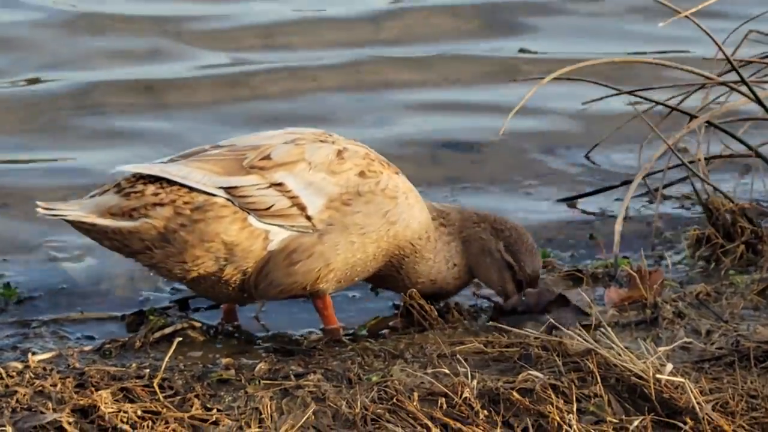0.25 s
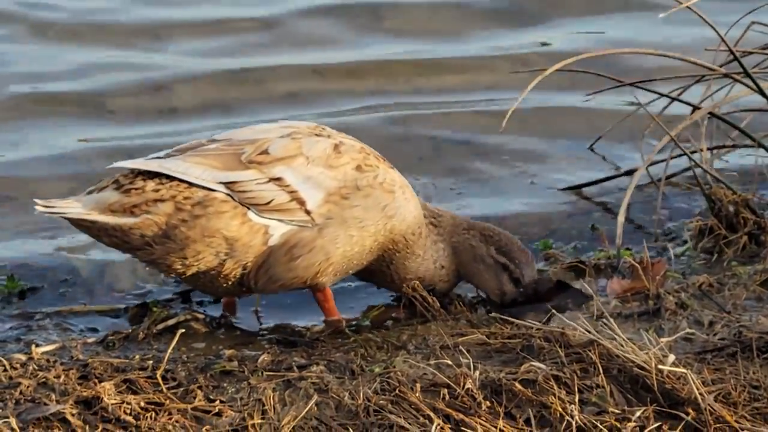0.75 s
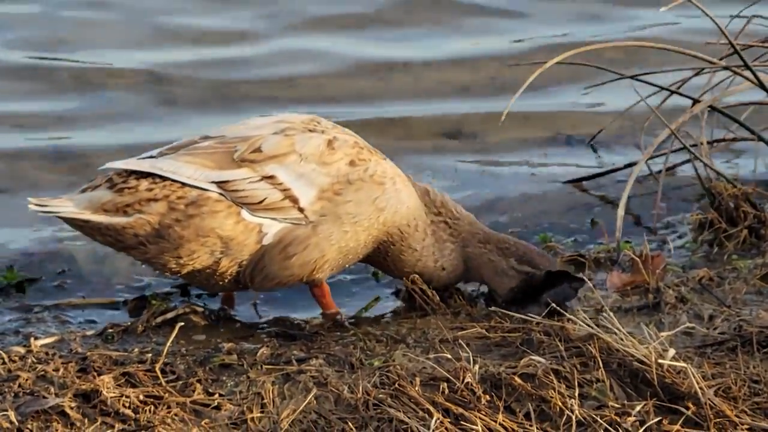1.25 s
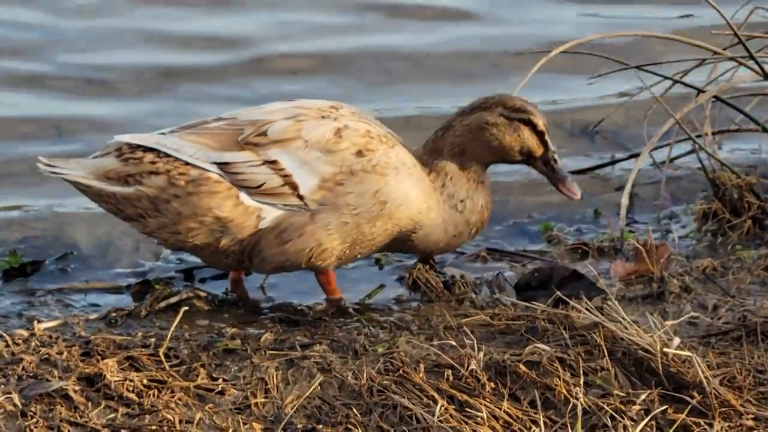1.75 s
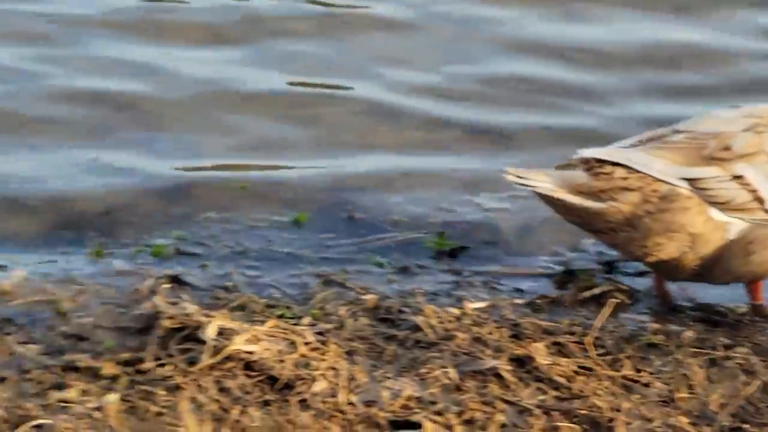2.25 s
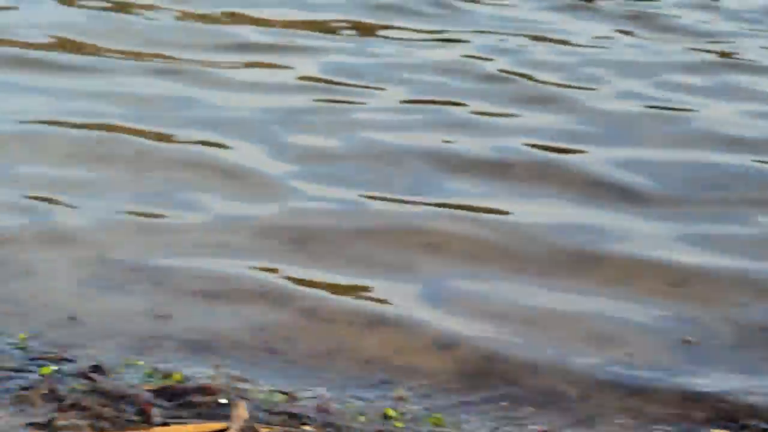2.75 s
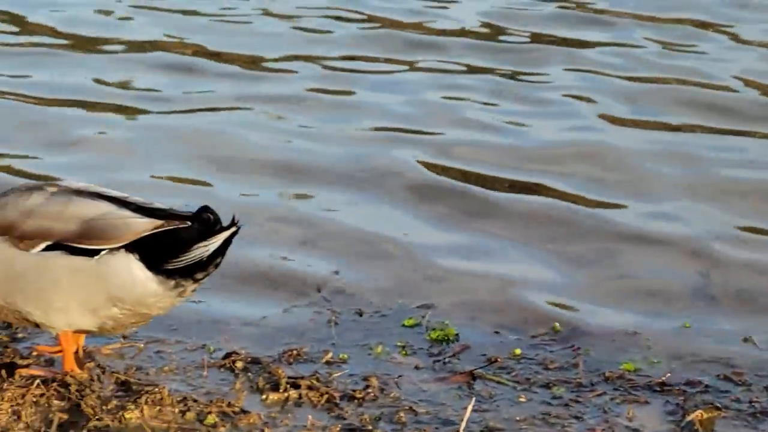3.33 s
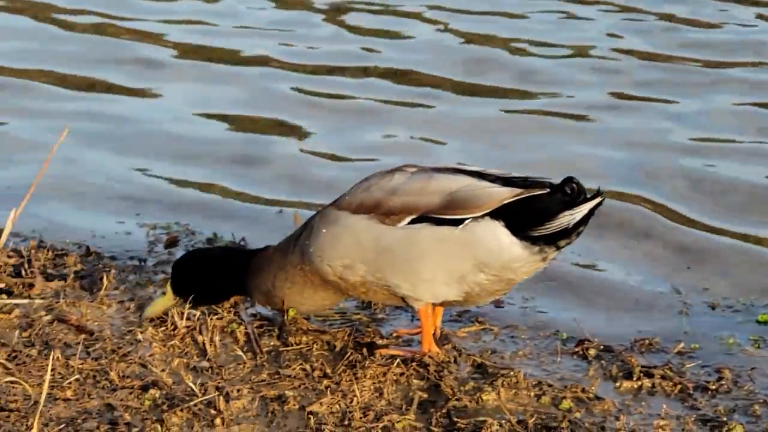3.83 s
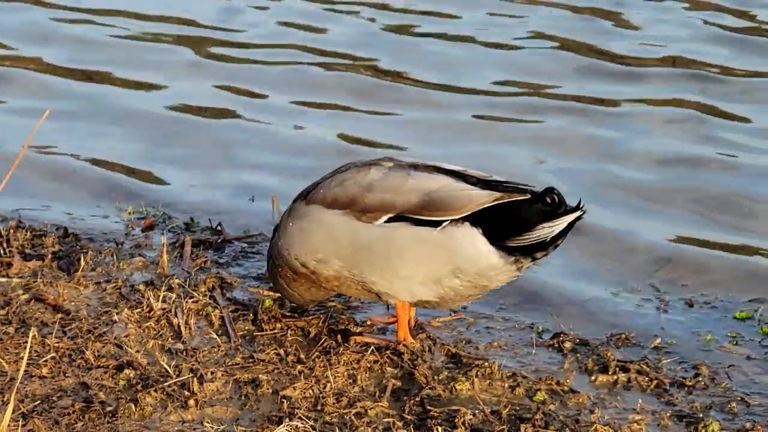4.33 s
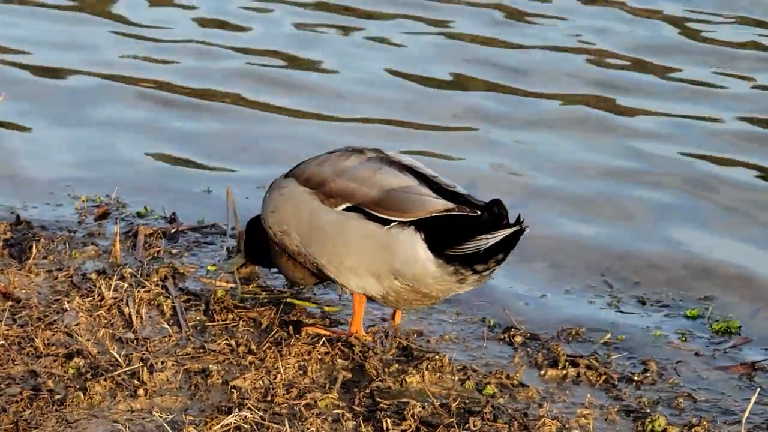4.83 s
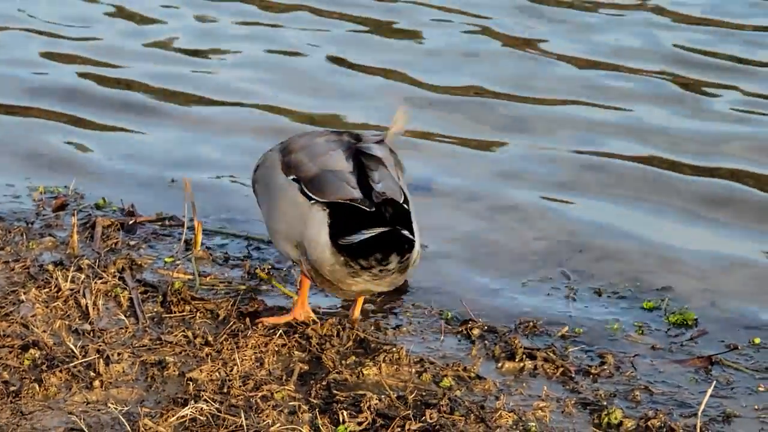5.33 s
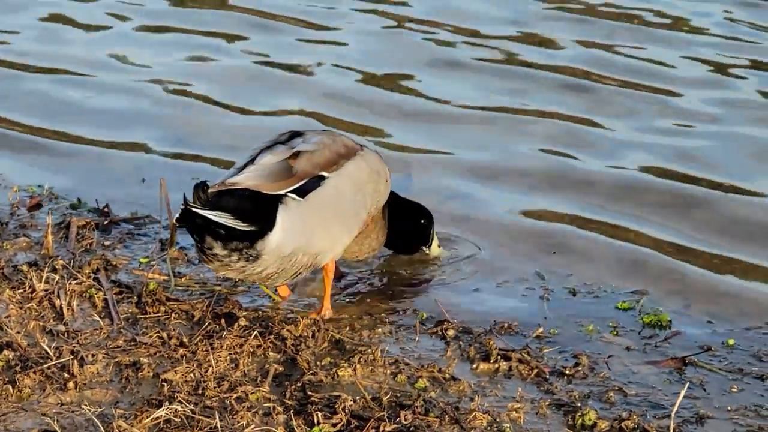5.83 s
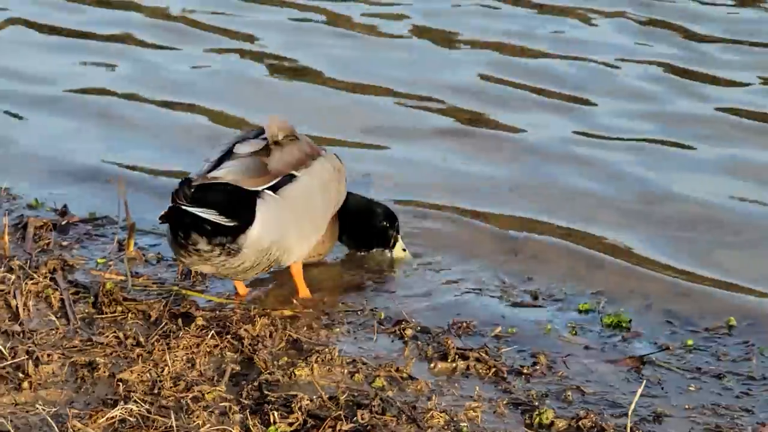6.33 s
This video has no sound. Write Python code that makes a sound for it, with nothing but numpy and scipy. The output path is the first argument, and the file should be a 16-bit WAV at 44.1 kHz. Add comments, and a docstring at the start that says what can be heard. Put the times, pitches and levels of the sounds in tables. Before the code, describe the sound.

Close by on a muddy shore, a duck works its bill fast through wet mud: sharp wet pops, squelching and fine crackle, strongest just after one second. It pauses around two seconds, then a second duck brings another crisp burst near three. After that only scattered ticks and small bubbles remain. Wind flutters and thumps low on a hand-held stereo microphone, over faint open-air rumble and hiss.

```python
"""A muddy shore, where two ducks dabble: their bills pop, squelch and crackle through wet mud and stalks.
Each pop is a burst of snaps and noise that rings a cavity; the squelch is made of many tiny bubbles.
Larger bubbles plop in the shallows, and a close surface, the ground and the bank echo the feeding.
Wind, made of filtered noise, rumbles and thumps on the two ports of a hand-held microphone,
over a far rumble of open air and a soft hiss."""
import sys
import numpy as np
from scipy import signal
from scipy.fft import rfft, irfft, next_fast_len
from scipy.io import wavfile
from scipy.ndimage import uniform_filter1d

SR = 44100
rng = np.random.default_rng(int(sys.argv[2]) if len(sys.argv) > 2 else 0)


def unload_wav(signal):
    """Save mono or channel-first audio to the path in sys.argv[1] as 16-bit WAV at rate SR, clipped to [-1, 1]."""
    wavfile.write(
        sys.argv[1],
        SR,
        np.round(np.clip(np.atleast_2d(signal).T, -1, 1) * 32767).astype(np.int16),
    )


N = 290178
TIME = np.arange(N) / SR  # seconds

# Strength of the gusts on the ports. Each row: time in seconds, left level in dB, right level in dB.
GUSTS = [(0.0, -30, -35.5), (0.25, -29.5, -35), (0.62, -41.5, -43), (0.95, -38.5, -39), (1.2, -29.5, -23),
         (1.5, -38.5, -43.5), (2.1, -33, -39.5), (2.7, -31.5, -37.5), (3.2, -39.5, -42.5),
         (3.42, -30.5, -37), (3.9, -37, -46), (4.05, -34, -32), (4.2, -44, -43.5), (4.8, -35.5, -39.5),
         (5.2, -42.5, -46), (5.38, -29.0, -34), (5.75, -32, -37.5), (6.05, -39.5, -42), (6.58, -37.0, -42)]
# Tone of the wind rumble. Each row: pitch in Hz, level in dB.
WIND_COLOUR = [(18, -12), (35, -4.5), (55, 0), (80, -1.5), (120, -11.5), (170, -20), (240, -27), (400, -53),
               (900, -75)]
# Tone of the far rumble of open air. Each row: pitch in Hz, level in dB.
AIR_COLOUR = [(30, 2), (70, 20.5), (120, 17), (170, 9), (250, 4), (420, 0.5), (550, 1.5), (660, -5),
              (850, -7), (1200, -12.5), (1500, -25), (3000, -34.5)]
# Tone of the high hiss. Each row: pitch in Hz, level in dB.
HISS_COLOUR = [(900, 3.5), (1600, -3.5), (2300, -0.5), (3200, 3.5), (4500, -0.5), (6800, -0.5),
               (8000, -4.5), (9700, -19.5), (12500, -8.5), (16000, -15.5)]
# Loudness of the hiss. Each row: time in seconds, level in dB.
HISS_LEVEL = [(0, -51.5), (1.3, -48.5), (1.6, -54.5), (2.15, -53.5), (2.4, -52), (2.8, -48), (3.5, -49),
              (4.1, -50), (5.2, -50), (5.9, -51), (6.58, -50.5)]
# How hard the bills work the mud. Each row: time in seconds, effort in dB.
DABBLE_EFFORT = [(0, -45.5), (0.17, -50), (0.33, -47.5), (0.6, -44), (0.8, -51.5), (1.05, -46),
                 (1.15, -43.5), (1.3, -40.5), (1.5, -49.5), (1.75, -53.5), (2.4, -56), (2.75, -52.5),
                 (3.05, -50), (3.35, -45.5), (3.55, -58), (4.5, -58), (4.8, -53.5), (5.2, -60), (6.58, -59)]
# Tiny bursts that make up squelch, smack and crackle. Each row: lowest pitch in Hz, highest pitch in Hz,
# level in dB against the effort for the first duck, the same for the second duck, bursts per second.
MUD_GRAINS = [(697, 1750, -2.5, -6.5, 240), (1940, 3850, 2, -2.5, 420), (4360, 7800, -6, -2, 320)]
# Pops of wet mud at the bills. Each row: start in seconds, length in seconds, starting cavity pitch in Hz,
# base level in dB (rms over 10 ms), level of the tear in dB against that base,
# tilt of the tear in dB per octave, lag of the right side in ms.
MUD_POPS = [(0.058, 0.0014, 2500, -39.5, -1, -6.5, 0.46), (0.132, 0.0029, 5400, -37.5, 3.5, -4.5, 0.43),
            (0.1582, 0.0021, 7600, -39, -4, 0, 0.08), (0.217, 0.0045, 3160, -46.5, 11, 0, 0.1),
            (0.2631, 0.004, 3240, -38, 8.5, -1.0, 0.0), (0.2861, 0.003, 2050.0, -42, 8.5, 0, 0.58),
            (0.3207, 0.0022, 6590.0, -40, -3, 9.5, 0.0), (0.3268, 0.0023, 6140, -43, 12.5, -5, 0.21),
            (0.351, 0.0024, 2080, -38.5, 3, -4, 0.43), (0.3779, 0.0058, 1300, -39.5, -2, -9.0, -0.12),
            (0.456, 0.013, 3560, -37, 0.5, -5, -0.08), (0.466, 0.003, 3550, -42.5, 0, 1, 0.49),
            (0.5256, 0.0013, 2000, -21.5, -6.5, -4.5, 0.45), (0.5673, 0.0013, 2260, -42, -7, 8, 0.48),
            (0.5804, 0.0051, 1050, -42.5, 1.5, -8, 0.07), (0.6014, 0.0051, 1930, -36.5, -2, -2, 0.48),
            (0.62, 0.0075, 3440, -37.5, 1, -4, 0.47), (0.6688, 0.0017, 3080, -21.5, -6.5, -1, 0.45),
            (0.6765, 0.0016, 4040, -26.0, -8, -4, 0.53), (0.709, 0.0023, 3520, -42, -3.5, 6, 0.49),
            (0.8244, 0.0025, 3470, -31.5, -6.5, -2.5, 0.46), (0.8876, 0.0027, 2590, -36, -8, -1.0, 0.45),
            (0.9109, 0.002, 6940, -34.0, -12, 0, 0.0), (0.966, 0.01, 3640, -43, 3, -0.5, 0.58),
            (0.991, 0.0014, 2120, -36, -13, 1, 0.48), (1.0143, 0.0021, 6660, -33.5, -3.5, 0.0, -0.08),
            (1.0283, 0.0073, 2200, -29.5, -3, -4.0, 0.49), (1.0965, 0.0028, 2110, -32.5, -1, 0, 0.45),
            (1.1642, 0.0029, 3870, -31.5, -1.5, 3, 0.59), (1.2018, 0.0042, 6010.0, -39.5, 5, 3.5, 0.0),
            (1.2273, 0.0019, 6520.0, -31.5, -1, -1.5, 0.0), (1.2599, 0.003, 3760, -14.5, -16, 4, -0.057),
            (1.2641, 0.0045, 4550, -26.5, -6, 5.5, 0.0074), (1.2887, 0.0026, 3050, -32.0, -15, -1.0, 0.5),
            (1.2987, 0.00082, 3030, -31.0, -9, -9, 0.42), (1.3278, 0.0013, 3720, -25, -3, -3, 0.59),
            (1.358, 0.0022, 3580, -31, -3.5, -2.5, 0.5), (1.3887, 0.0028, 1250, -36.5, 1, -2.5, -0.044),
            (1.4166, 0.0046, 1260, -36.5, 1.5, -5.5, 0.56), (1.4775, 0.005, 3330, -36.5, 0, -3.0, 0.48),
            (1.5421, 0.004, 3580, -25, -5, -2.5, 0.43), (1.608, 0.0055, 3360, -35.5, 2, -3.5, 0.44),
            (1.643, 0.0027, 2100, -37, -13, -5, 0.48), (1.6758, 0.00082, 2320, -21.5, -9, -5.5, 0.5),
            (1.7531, 0.00057, 3000, -34.5, 1, -4.5, 0.43), (1.8557, 0.0025, 1770.0, -37, -14, 4, 0.47),
            (1.8834, 0.0008, 2310, -31.5, -19, 2, 0.48), (1.8929, 0.003, 3400, -36.5, 0.5, -2.5, 0.45),
            (1.984, 0.0011, 5440, -53.5, 4, 4, 0.52), (2.0022, 0.0024, 3360, -52.5, 9.5, 0, 0.5),
            (2.362, 0.004, 1910, -42.5, -14, -6, 0.4), (2.3819, 0.0017, 3600, -39.5, -2.5, -3.5, 0.45),
            (2.4362, 0.0035, 6240, -47, 7.5, -2.5, 0.42), (2.5037, 0.0046, 6640, -44.5, 4, 0.0, 0.49),
            (2.6506, 0.0083, 2680, -37, -5.5, 0, 0.5), (2.7259, 0.0038, 1830.0, -43, -1.0, -3.5, -0.097),
            (2.8429, 0.00066, 4950, -23.5, -14, 5, 0.46), (2.8921, 0.0086, 6540, -46.5, 5.5, 1, 0.31),
            (2.9505, 0.0012, 3140, -38.5, -0.5, 0, 0.22), (2.9641, 0.0025, 5070, -29.5, -4, 5, 0.38),
            (3.0053, 0.0028, 2850, -36.5, 0, 3.5, 0.38), (3.0285, 0.00026, 3170, -19.5, -7, 1.5, 0.14),
            (3.0558, 0.0097, 5040, -38.5, 0.5, -3, 0.16), (3.0856, 0.003, 6700, -38.5, 3, -2.5, 0.36),
            (3.145, 0.0041, 6200, -40.5, 6.5, -3, 0.1), (3.2041, 0.004, 3100, -37.5, -1, -3.5, 0.083),
            (3.2562, 0.0032, 3150, -35.5, -7, -1, 0.11), (3.2721, 0.0032, 3160, -26, 2.5, 1.5, 0.34),
            (3.3179, 0.00098, 4930.0, -33.0, 1, -4, 0.35), (3.3315, 0.00098, 5000, -31.0, 0, -1, 0.29),
            (3.3891, 0.0015, 5040, -25.0, 1, -0.5, 0.32), (3.4448, 0.006, 4900, -48, 8, -4, 0.37),
            (3.4579, 0.0019, 4950, -30, -13, -5, 0.11), (3.731, 0.002, 2850, -42, -13, 3, -0.095),
            (3.8026, 0.0035, 1230, -48.5, 2.5, -1.5, 0.11), (4.3463, 0.0028, 4920, -34, -21, -6, 0.032),
            (4.384, 0.0031, 5100, -49, -7.5, 8, -0.3), (4.629, 0.0081, 2880, -48.5, -1, -1.5, 0),
            (4.703, 0.004, 1280, -45, 2, -1.5, 0.22), (4.7151, 0.0013, 5000, -36.5, -23, 0, 0.063),
            (4.7621, 0.0045, 7360, -36.5, -4.5, 2, 0.056), (4.787, 0.001, 4030, -37, -16.5, 10.5, 0.058),
            (4.8405, 0.009, 1830, -52.5, 3, -6.5, -0.08), (4.8626, 0.002, 1650, -40.0, -0.5, -6, 0.083),
            (4.9145, 0.0029, 12200, -40.5, -6.5, 0, 0.27), (4.95, 0.007, 3000, -43.5, 2, 2.5, -0.05),
            (4.9845, 0.00035, 6500, -26.5, -19, 3, 0.098), (5.0641, 0.00085, 7650, -22.5, -20, -3.5, -0.43),
            (5.2824, 0.0042, 5770, -43, -7.5, -5.5, 0.07), (5.581, 0.0005, 11860.0, -41.5, -6.5, 6, 0.07),
            (5.6494, 0.004, 2750, -40, -0.5, -2.0, -0.34), (5.6658, 0.003, 7300, -37.5, -9, -2, -0.07),
            (5.73, 0.0026, 5530, -43, -21, 2, 0.07), (6.1346, 0.00074, 3880, -41.5, -16.5, -8, 0.0),
            (6.1726, 0.00085, 3460, -34, -21, -9.5, 0.29), (6.2343, 0.00068, 7040, -30, -14, 2, 0.23),
            (6.323, 0.0008, 4430, -45, -16, 10, 0.32), (6.3667, 0.0061, 2680, -38.5, -11, -6, -0.073),
            (6.3941, 0.00079, 3720, -23, -14, -2, -0.0033)]
# Bands of squelch, smack, crackle and spray in a tear. Each row: low edge in Hz, high edge in Hz,
# level in dB against the tear for the first duck, the same for the second duck.
TEAR_BANDS = [(650, 1850, -10, -8), (2000, 3700, -1, -3), (4540, 7400, -11, -1.5), (8500, 13500, -13, -13)]
# Where pops are heard: their treble sits further right. Each row: pitch in Hz, left minus right in dB.
POP_PAN = [(600, 0), (1100, -1), (2000, -3), (4000, -6), (8000, -8.5), (14000, -5.5)]
# Single eddies that thump the ports. Each row: time of the middle in seconds before a short fixed delay,
# peak in dB before trim and panning, pitch in Hz, left minus right in dB.
BUFFETS = [(0.067, -21, 77, 11), (1.799, -25, 48, -3), (1.963, -22.5, 65.2, 4), (2.199, -18.5, 43, 27),
           (2.948, -22, 72, 16), (3.04, -21.5, 47, 9), (3.375, -27, 102.5, 0), (5.327, -20.5, 47, 18),
           (5.443, -19, 75, 14), (5.663, -22.5, 58.5, 9), (5.828, -19.5, 112, 16)]
# Larger bubbles in the shallows. Each row: start in seconds, strength in dB before trim, starting pitch in Hz.
PLOPS = [(0.212, -39, 467), (0.38, -27, 910), (0.673, -39, 340), (1.047, -45, 430), (1.261, -22, 985),
         (1.38, -28, 946), (1.544, -31.5, 650), (1.75, -42, 538), (2.579, -38.5, 884), (2.631, -40, 794),
         (2.667, -40, 453), (2.723, -37, 535), (2.801, -37, 522), (3.027, -31.5, 490), (3.084, -39, 527),
         (4.564, -39, 730), (4.594, -40, 713), (4.624, -34, 290), (4.778, -36, 970), (5.231, -36.5, 580),
         (5.649, -45, 283), (5.655, -36, 504)]
# How the ports colour the sound. Each row: pitch in Hz, level in dB.
PORT_COLOUR = [(100, 2), (7000, -3), (8500, -2.5), (9800, 1), (12000, -1), (16000, 3)]
# Right side of the microphone against the left. Each row: pitch in Hz, level in dB.
RIGHT_COLOUR = [(100, 1), (2000, -1), (4000, 0.5), (6500, 3), (9700, -7), (12500, -1), (16000, -4)]

SECOND_DUCK_S = 2.15  # from here on the second duck is the nearer one
FIRST_DUCK_LAG_MS = 0.48  # its sound reaches the right port later
REST_DB = -60.5  # below this effort the mud is not stirred
PAUSE_S, PAUSE_DB = (2.0, 2.33), -8.5  # the first duck lifts its head and the mud falls quieter
# The bill chatters: typical rate, swing of level each way, unevenness of the timing
STROKES_PER_S, STROKE_DB, STROKE_SPREAD = 14.2, 4.5, 0.25
GRAIN_CYCLES = 2.8  # typical ringing of a tiny burst, scaled at random
TILT_PIVOT_HZ = 3000  # the spectrum of a tear tilts about this pitch
THUD_HZ, THUD_DB = (247, 670), -17.5  # dull shove of the mud under each tear; level against the tear
TOP_HZ = 15900  # the sound is cut above this pitch


def undb(db):
    """Turn decibels into gain."""
    return 10 ** (np.asarray(db) / 20)


def unit(x):
    """Scale to an average strength (rms) of 1."""
    return x / np.sqrt(np.mean(x ** 2) + 1e-30)


def curves(table):
    """Join each column of a table by straight lines in time."""
    s, *columns = np.transpose(table)
    return [np.interp(TIME, s, column) for column in columns]


def colour(x, points):
    """Filter a sound so that its tone follows a curve of (Hz, dB) points."""
    hz, db = np.transpose(points)
    size = next_fast_len(x.shape[-1])
    f = np.maximum(np.fft.rfftfreq(size, 1 / SR), 1)
    gain = undb(np.interp(np.log(f), np.log(hz), db))
    return irfft(rfft(x, size) * gain, size)[..., :x.shape[-1]]


def band(x, low_hz, high_hz, order=3):
    """Keep the pitches between two edges, without sounding ahead of time."""
    b, a = signal.butter(order, [low_hz, high_hz], "band", fs=SR)
    return signal.lfilter(b, a, x)


def stereo_noise(likeness):
    """Make left and right noises that share a part: 0 is unrelated, 1 is identical."""
    mid, side = rng.standard_normal((2, N))
    return np.sqrt(1 + likeness) * mid + np.sqrt(1 - likeness) * np.array([side, -side])


def sides(pan_db):
    """Left and right gains of mean power 1; a positive pan leans left."""
    return unit(undb(np.array([pan_db, -pan_db]) / 2))


def add(out, sound, s, pan_db=0, lag_ms=0):
    """Put a sound into both channels, the right one later by the lag."""
    for channel, gain, start in zip(out, sides(pan_db), (s, s + lag_ms / 1000)):
        i = int(np.clip(start * SR, 0, N))
        channel[i:i + len(sound)] += gain * sound[:N - i]


def bubble(hz, cycles, glide):
    """A cavity rings down by 1/e in so many cycles; its pitch climbs as it opens."""
    age = np.arange(int(6 * cycles * SR / hz) + 3) * hz / SR  # counted in cycles
    swing = np.sin(2 * np.pi * age * (1 + glide * age / cycles / 10))
    flow = (1 - np.exp(-2 * age)) * np.exp(-age / cycles) * swing
    return np.diff(flow) * SR / (2 * np.pi * hz)  # sound follows the change of flow


def wind():
    """Eddies buffet each port on their own; gusts set their strength."""
    eddies = unit(colour(rng.standard_normal((2, N)), WIND_COLOUR))
    swell = uniform_filter1d(eddies ** 2, size=4000, axis=1) + 1e-9
    # the eddies are evened out so that the gusts alone shape the swell
    even = unit(eddies / np.sqrt(swell))
    return even * undb(curves(GUSTS))


def drift(size=9000):
    """A slow random wander of spread 1: held random steps, smoothed twice."""
    held = np.repeat(rng.standard_normal(N // size + 1), size)[:N]
    smooth = uniform_filter1d(held, size=size)
    return unit(uniform_filter1d(smooth, size=size))


def air(air_db=-43.0, hiss_pan_db=-4.5, drift_db=0.6):
    """A far, low rumble of open air drifts in level under a hiss that leans right."""
    rumble = undb(air_db) * unit(colour(stereo_noise(0.81), AIR_COLOUR))
    hiss = unit(colour(stereo_noise(0.011), HISS_COLOUR)) * undb(curves(HISS_LEVEL)[0])
    return rumble * undb(drift_db * drift()) + hiss * sides(hiss_pan_db)[:, None]


def effort():
    """Strength of the dabbling: only work above a resting level stirs the mud."""
    power = undb(2 * curves(DABBLE_EFFORT)[0]) - undb(2 * REST_DB)
    work = np.sqrt(np.maximum(power, undb(-140)))
    pause = 1.0 * ((TIME > PAUSE_S[0]) & (TIME < PAUSE_S[1]))
    return work * undb(PAUSE_DB * uniform_filter1d(pause, size=3000))


def strokes(size=200):
    """The bill opens and shuts quickly and unevenly: a gain that swings once a stroke."""
    gaps = np.exp(STROKE_SPREAD * rng.standard_normal(size)) / STROKES_PER_S
    starts = np.cumsum(gaps)
    turns = np.interp(TIME, starts - starts[0], np.arange(size))
    return unit(undb(STROKE_DB * np.cos(2 * np.pi * turns)))


def nibbling(spread_db=5.3):
    """Tiny films burst around the bill, louder as it works harder."""
    out = np.zeros((2, N))
    work = effort() * strokes()
    for low_hz, high_hz, first_db, second_db, rate in MUD_GRAINS:
        grains = np.zeros((2, N))
        for when, pitch, strength, ring, place in rng.random((int(rate * N / SR), 5)):
            s = when * N / SR
            hz = low_hz * (high_hz / low_hz) ** pitch
            gain = undb(-spread_db * np.log(0.13 + strength))  # a few are much louder than most
            cycles = GRAIN_CYCLES * (0.21 + 1.4 * ring ** 2)
            # the first duck stands off to one side
            lag_ms = FIRST_DUCK_LAG_MS * (s < SECOND_DUCK_S and place < 0.75)
            add(grains, gain * bubble(hz, cycles, glide=0.1), s, -6 + 6 * place, lag_ms)
        duck_db = np.where(TIME < SECOND_DUCK_S, first_db, second_db)
        out += unit(grains) * work * undb(duck_db)
    return out


def tearing(length, first=1.4, rate=1100, grit=0.084, stretch=1.93, strain_s=0.0015, size=2048):
    """A mud film strains, then gives way: one snap, a quick run of smaller ones and a wet rush."""
    age = np.arange(-size // 8, size) / SR  # seconds from the main snap
    noise, strength = rng.standard_normal((2, len(age)))
    snaps = (rng.random(len(age)) < rate / SR) * strength
    rise = np.exp(np.minimum(age, 0) / (strain_s + 0.16 * length))
    fall = np.exp(-(np.maximum(age, 0) / (stretch * length)) ** 1.5)
    push = (snaps + grit * noise) * rise * fall + first * (age == 0)
    return push, age[0]


def pop(length, hz, db, tear_db, tilt, first_duck, cavity_db=1, ring=0.31, most_cycles=4.1):
    """A tear rings its cavity and scatters sound over four broad bands; returns sound and lead in s."""
    push, start = tearing(max(length, 1 / SR))
    # a cavity that bursts at once hardly rings
    cycles = min(0.92 + ring * hz * length, most_cycles)
    cavity = unit(signal.lfilter(bubble(hz, cycles, glide=0.027), 1, push))
    thud = unit(band(push, *THUD_HZ, order=2))
    thud_gain = undb(tear_db + THUD_DB)
    sound = undb(cavity_db) * cavity + thud_gain * thud
    power = undb(2 * cavity_db) + thud_gain ** 2
    for low_hz, high_hz, first_db, second_db in TEAR_BANDS:
        octaves = np.log2(np.sqrt(low_hz * high_hz) / TILT_PIVOT_HZ)
        duck_db = first_db if first_duck else second_db
        gain = undb(tear_db + duck_db + tilt * octaves)
        sound = sound + gain * unit(band(push, low_hz, high_hz))
        power = power + gain ** 2
    # the summed power of the parts is set as if spread over 10 ms (SR / 100 samples)
    return undb(db) * unit(sound) * np.sqrt(power * SR / 100 / len(push)), start


def faint_pops(per_s=10, above_effort_db=1, scatter_db=3, low_hz=1700, high_hz=5500,
               length=0.0051, tear_db=-2, tilt=0.3):
    """Small tears between the loud ones follow the bills' effort; rows like those of MUD_POPS."""
    work, rows = effort(), []
    for k, (when, pitch, strength, span) in enumerate(rng.random((200, 4))):
        s = (k + when) / per_s
        if s < TIME[-1]:
            work_db = 20 * np.log10(work[int(s * SR)])
            db = work_db + above_effort_db + scatter_db * (2 * strength - 1)
            hz = low_hz * (high_hz / low_hz) ** pitch
            lag_ms = FIRST_DUCK_LAG_MS * (s < SECOND_DUCK_S)
            rows.append((s, length * (0.5 + span), hz, db, tear_db, tilt, lag_ms))
    return rows


def mud_pops():
    """Loud and faint pops of tearing mud, placed by the lag between the ports and by tone."""
    out = np.zeros((2, N))
    for s, length, hz, db, tear_db, tilt, lag_ms in list(MUD_POPS) + faint_pops():
        first_duck = s < SECOND_DUCK_S and lag_ms > FIRST_DUCK_LAG_MS / 2
        sound, start = pop(length, hz, db, tear_db, tilt, first_duck)
        # half the lag (in s) is taken off the left, so the two sides straddle the start
        add(out, sound, s + start - lag_ms / 2000, 0, lag_ms)
    panned = []
    for k, channel in enumerate(out):
        side_colour = [(hz, 20 * np.log10(sides(db)[k])) for hz, db in POP_PAN]
        panned.append(colour(channel, side_colour))
    return np.array(panned)


def buffets(gain_db=-2, width_s=0.012, delay_s=0.0082, size=8192):
    """A strong eddy rocks the pressure at the ports a few times."""
    out = np.zeros((2, N))
    age = (np.arange(size) - size / 2) / SR
    for (s, db, hz, pan_db), turn in zip(BUFFETS, rng.random(len(BUFFETS))):
        thump = np.exp(-(age / width_s) ** 2) * np.sin(2 * np.pi * (hz * age + turn))
        early = max(0, -int((s + age[0]) * SR))  # samples that would fall before the beginning
        add(out, undb(db + gain_db) * thump[early:], s + age[early] + delay_s, pan_db)
    return out


def plops(gain_db=-1, cycles=5):
    """Bigger air pockets ring briefly in the shallow water."""
    out = np.zeros((2, N))
    for s, db, hz in PLOPS:
        add(out, undb(db + gain_db) * bubble(hz, cycles, glide=0.18), s)
    return out


def bank(x, bounce_s=0.002474, bounce_db=-11, near_db=-12, near_s=0.0071, far_db=-19, far_s=0.017, size=8192):
    """One close surface throws sound back; ground and stalks scatter it; a faint tail comes off the bank."""
    age = np.arange(size) / SR
    scatter = band(rng.standard_normal((2, 2, size)), 880, 3000, order=1)
    near, far = scatter * (1 - np.exp(-(age / 0.00017) ** 2))  # a very short fade-in
    echo = undb(near_db) * unit(near * np.exp(-age / near_s))
    echo = echo + undb(far_db) * unit(far * np.exp(-age / far_s))
    click = 1.0 * (np.arange(size) == int(bounce_s * SR))
    bounce = undb(bounce_db) * band(click, 320, 3000, order=1)
    return x + signal.fftconvolve(x, bounce + echo / np.sqrt(2 * size), axes=1)[:, :N]


def scene():
    """Feeding ducks and plops with their echoes, then wind and open air without."""
    feeding = mud_pops() + nibbling() + plops()
    return bank(feeding) + wind() + buffets() + air()


def record(dry):
    """The ports colour the sound, the loudest snaps are rounded and the top is cut."""
    left, right = colour(dry, PORT_COLOUR)
    heard = np.tanh([left, colour(right, RIGHT_COLOUR)])
    top_cut = signal.ellip(10, 0.2, 70, TOP_HZ, fs=SR, output="sos")
    return signal.sosfilt(top_cut, heard)


dry = scene()
out = record(dry)
unload_wav(out)
```